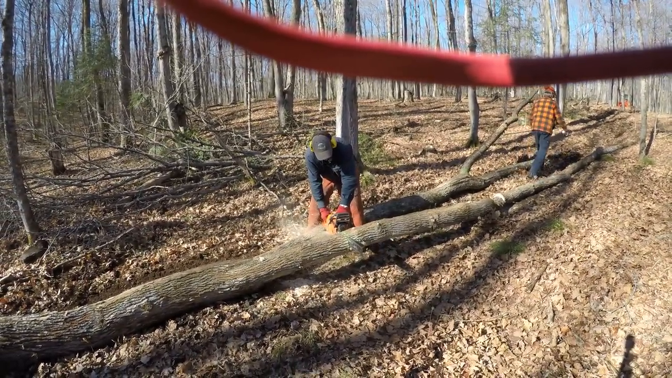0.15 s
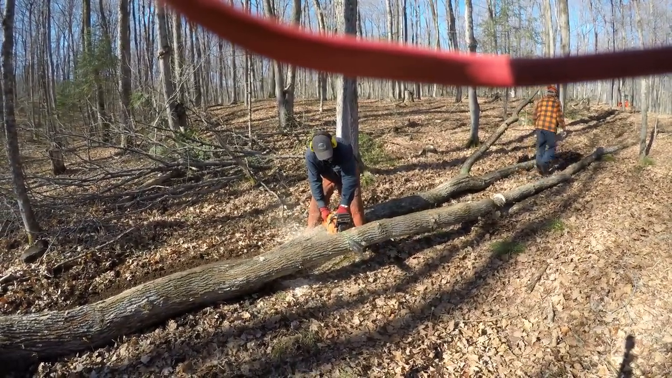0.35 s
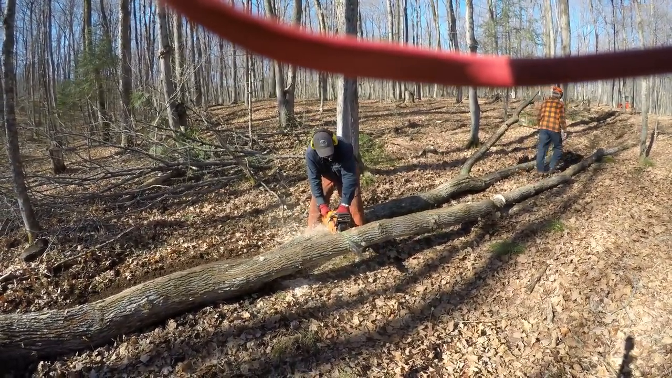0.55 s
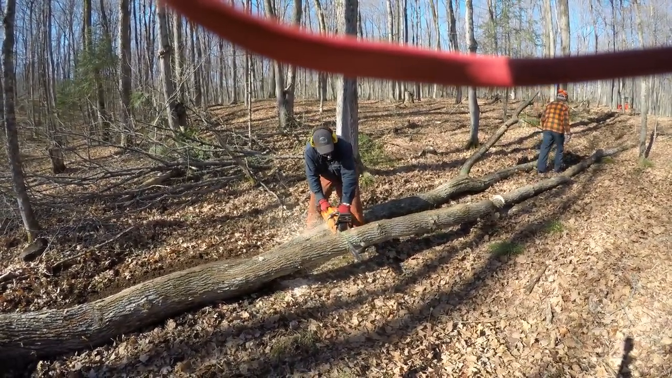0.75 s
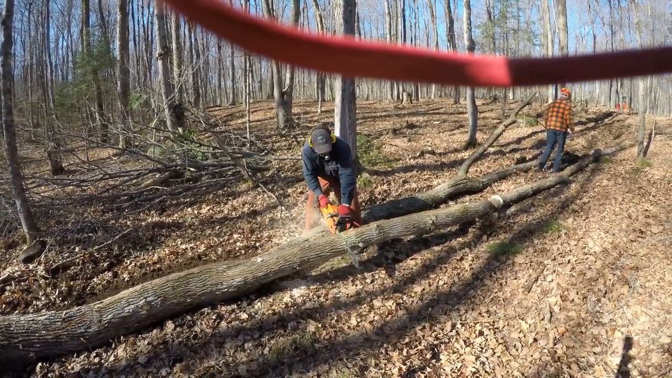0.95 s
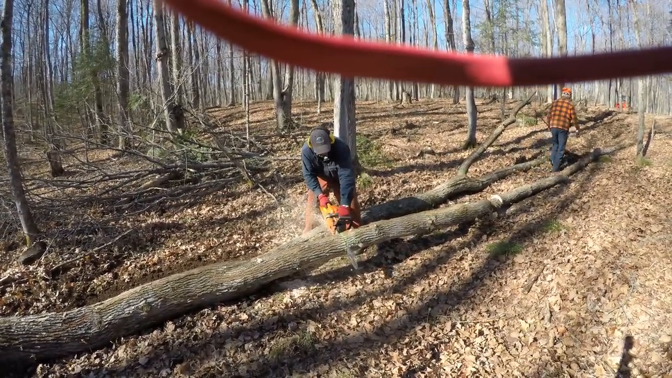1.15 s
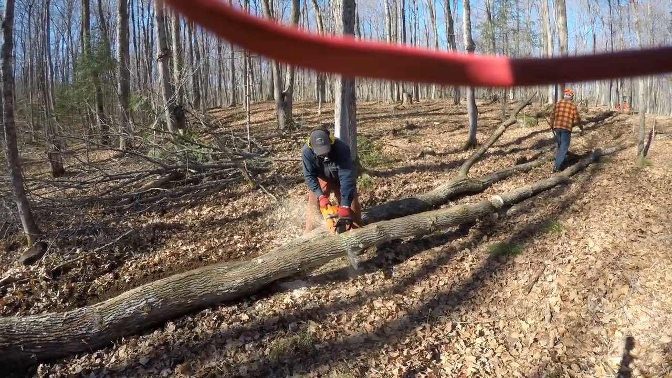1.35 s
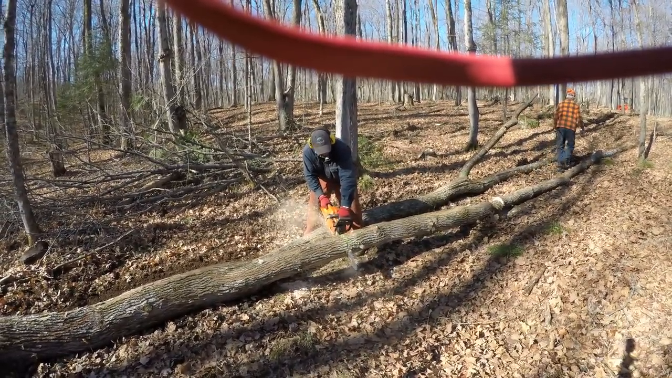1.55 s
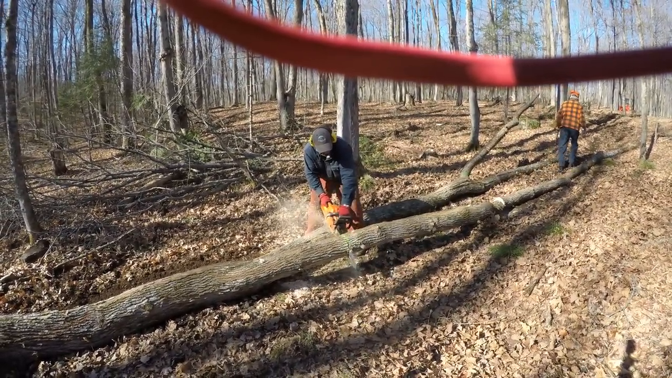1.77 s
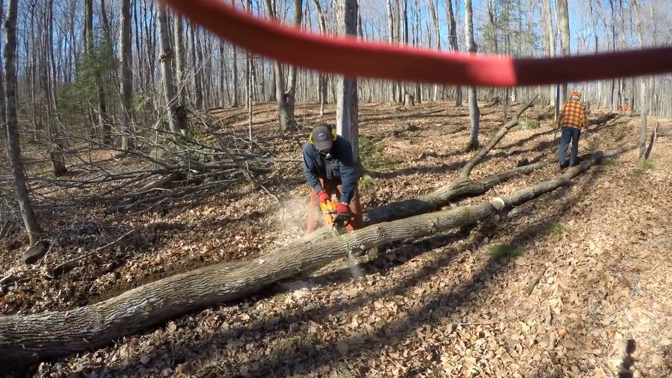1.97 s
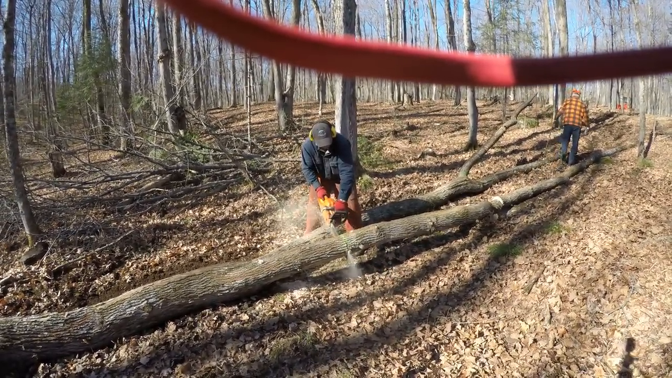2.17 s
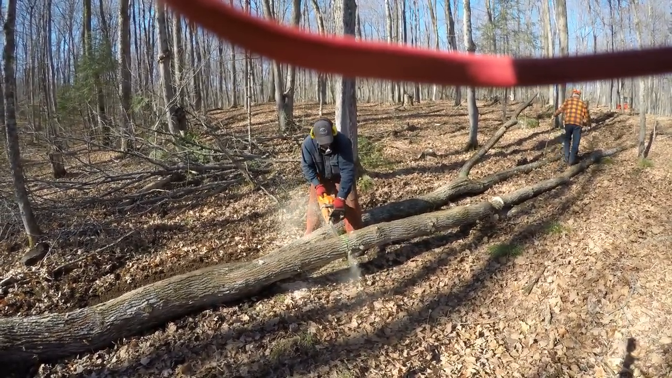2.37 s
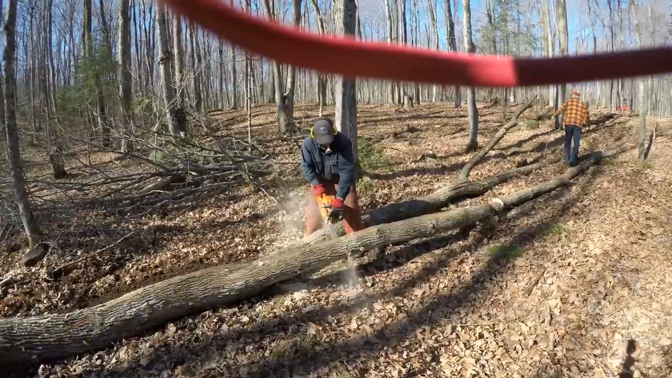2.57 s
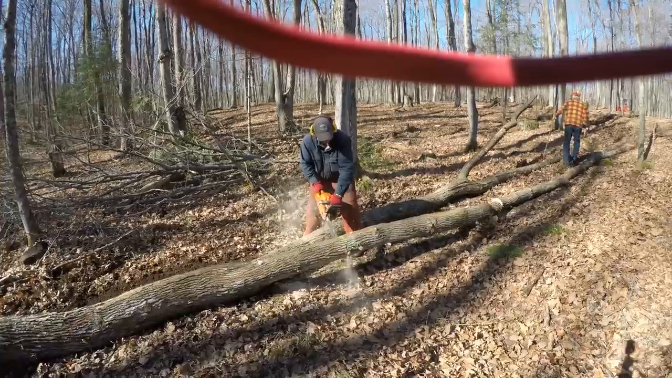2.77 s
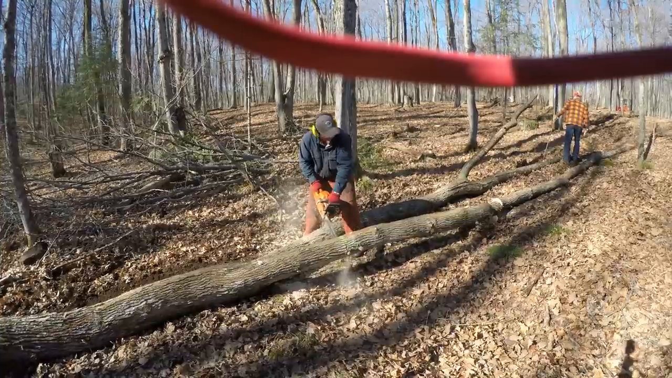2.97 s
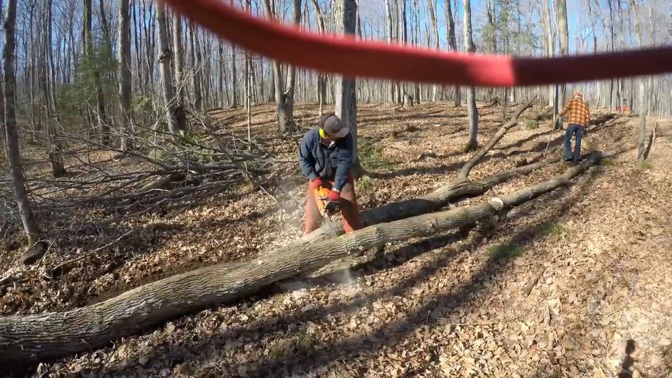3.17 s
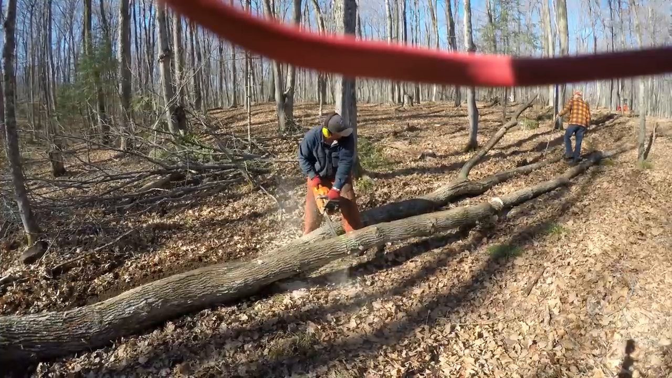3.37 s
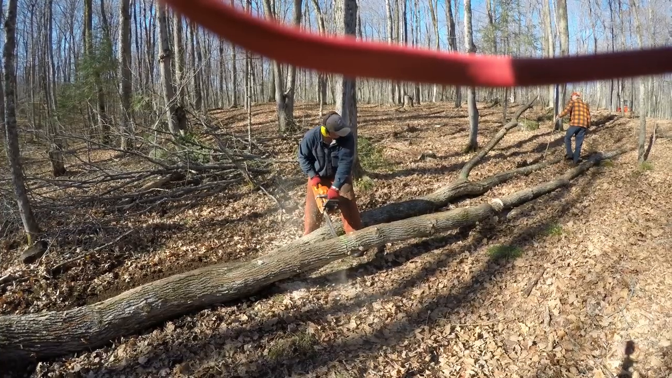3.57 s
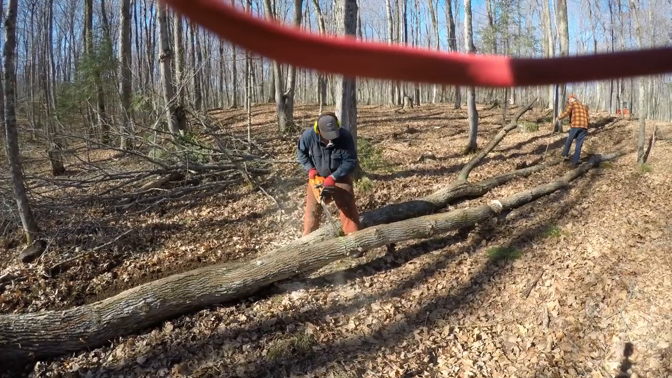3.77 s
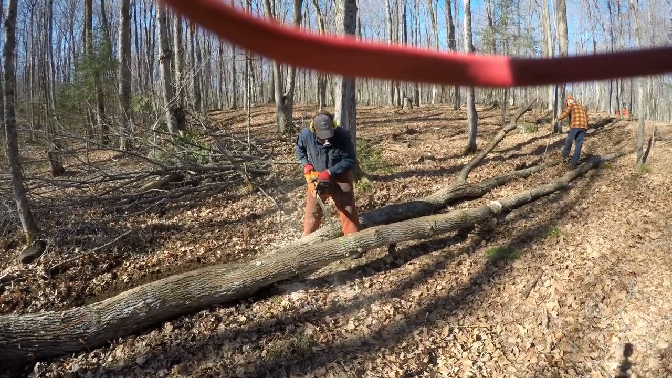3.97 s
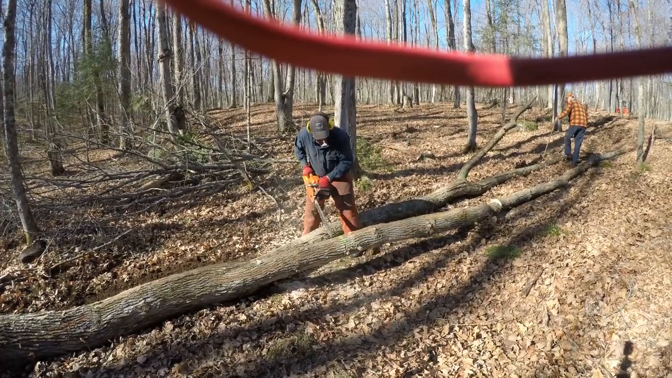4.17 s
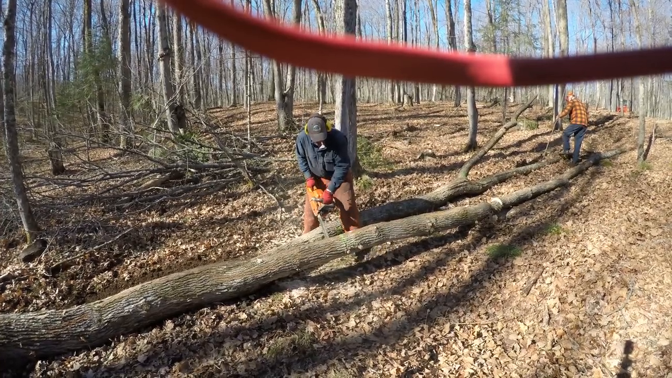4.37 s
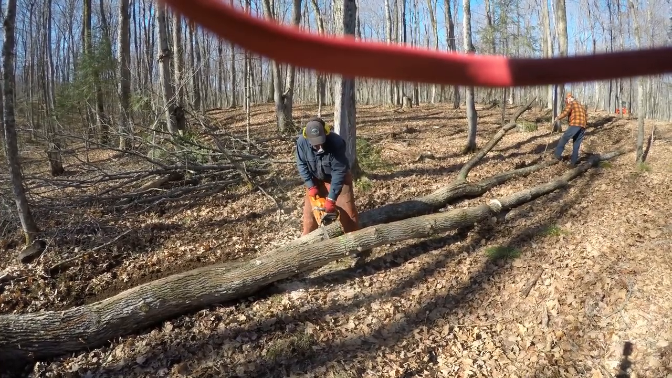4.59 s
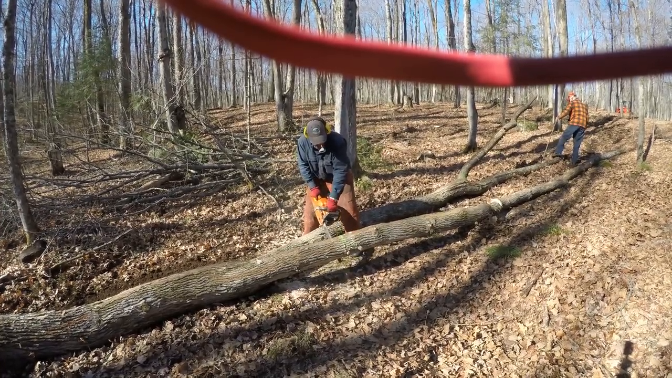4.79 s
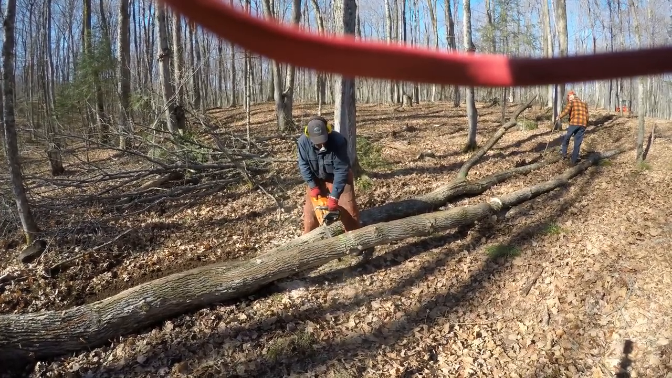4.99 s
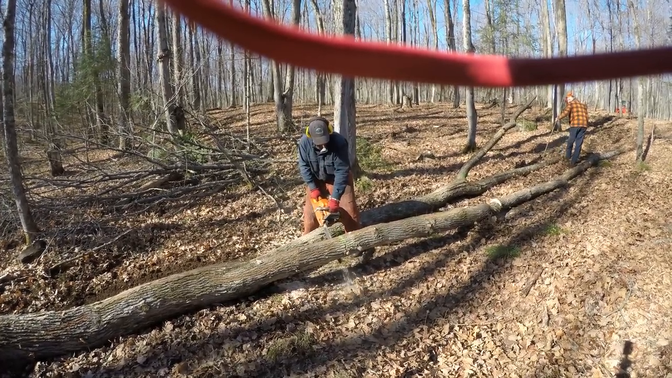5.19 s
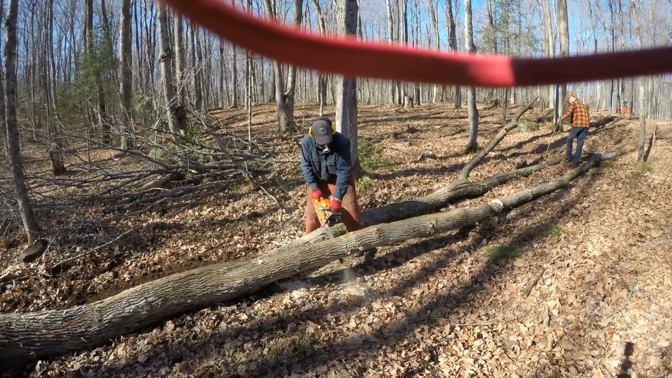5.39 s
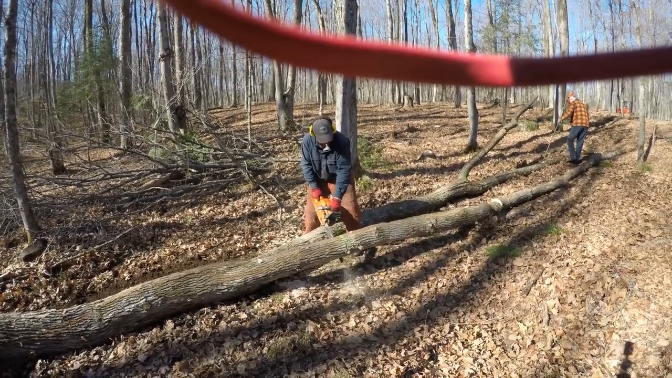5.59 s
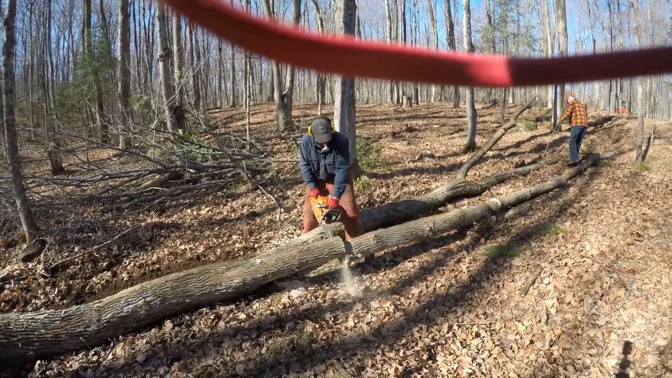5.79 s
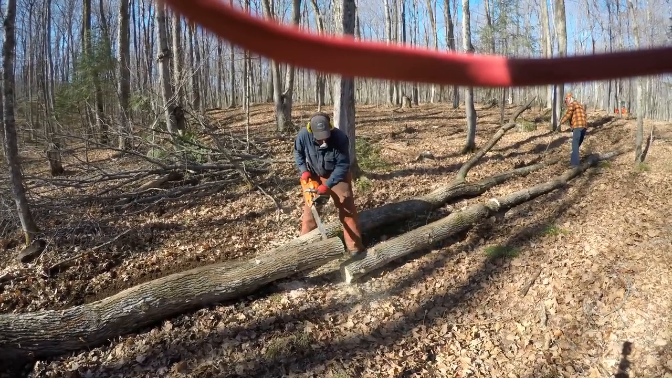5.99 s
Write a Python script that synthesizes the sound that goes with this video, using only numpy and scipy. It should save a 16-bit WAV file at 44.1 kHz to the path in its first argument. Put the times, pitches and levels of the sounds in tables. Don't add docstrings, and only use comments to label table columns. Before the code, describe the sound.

A two-stroke chainsaw roars through a log at full throttle, coasts down to a sputtering idle, revs up raggedly, then bogs abruptly as it pinches.

```python
import sys
import numpy as np
from scipy import signal
from scipy.fft import rfft, irfft, next_fast_len
from scipy.io import wavfile
from scipy.ndimage import uniform_filter1d, map_coordinates

SR = 44100
rng = np.random.default_rng(int(sys.argv[2]) if len(sys.argv) > 2 else 0)


def attenuation_scalar(level_db):
    decades = np.asarray(level_db, float) / 20
    return 10 ** decades


def digitize_waveform(pressure):
    field = np.atleast_2d(pressure).T
    bounded = np.clip(field, -1, 1)
    quanta = np.round(bounded * 32767).astype(np.int16)
    wavfile.write(sys.argv[1], SR, quanta)


N = 266364
SIZE = next_fast_len(N + SR)
FREQ_HZ = np.arange(SIZE // 2 + 1) * SR / SIZE + 1e-3
FINS = 18

# time in seconds, crack peak in dB, thump in dB, gas in dB.
LONE_FIRINGS = [(3.807, -34, -21.5, -32), (3.876, -21, -15.5, -38), (3.974, -21, -14.5, -21),
                (4.082, -25, -16.5, -46), (4.173, -18.5, -15, -22), (4.267, -22, -19, -22),
                (4.341, -21, -22, -23), (4.389, -17, -13.5, -13.5), (4.46, -18, -14, -16),
                (4.483, -16, -13.5, -18.5), (4.505, -10.5, -11, -12.5), (4.541, -14, -11, -8.5),
                (4.572, -18, -13, -13.5), (4.598, -21, -21, -15.5), (5.91, -16, -16, -30),
                (5.939, -14.5, -20, -34)]
# frequency in Hz, gain in dB.
HISS_COLOUR = [(590, -36), (1000, -10.5), (1240, -12.5), (1470, 1), (2150, -5.5), (4120, 0), (5040, -6),
               (6760, 0.5), (8270, -12), (10400, -13), (11500, -23), (12400, -21.5), (13000, -13.5),
               (13400, -87), (14700, -105)]
# frequency in Hz, width in Hz, gain in dB.
CASING_MODES = [(685, 49, 1), (1240, 53, 10), (1766, 66, 2), (2675, 490, 0), (3130, 78, 0.5),
                (3700, 97, -1), (4144, 50, 4.5), (4500, 240, 3), (6780, 460, -8.5), (9300, 150, 2)]
# frequency in Hz, width in Hz, gain in dB.
COVER_MODES = [(1770, 60, 0), (2700, 120, -10), (3790, 110, -5), (4600, 200, -9), (6500, 200, -11)]
# frequency in Hz, left minus right in dB, left lead in radians,
# shared part of the noise (0-1).
PORT_PAIR = [(50, -2.5, 0, .99), (230, -3.5, .4, .99), (400, 4, 1.3, .97), (490, 8.5, 2.6, .95),
             (640, -13, 4.6, .95), (780, -10, 6.5, .97), (950, 3, 7.2, .95), (1200, 0, 6.5, .94),
             (2400, 3.5, 6.6, .92), (4500, 3.5, 6.3, .98), (5000, 5, 5.4, .6), (7000, -5, 6.8, .65),
             (8500, -1, 8.5, .2), (10500, 2, 5.5, .25), (14000, -2, 6.3, .4)]


def on_freq(table, order=1):
    rows = np.array(table, float)
    return np.interp(np.log(FREQ_HZ), np.log(rows[:, 0]), rows[:, order])


def colour(x, gain_db):
    cepstrum = irfft(gain_db * np.log(10) / 20)
    half = len(cepstrum) // 2
    cepstrum[1:half] *= 2
    cepstrum[half + 1:] = 0
    return irfft(rfft(x, SIZE) * np.exp(rfft(cepstrum)), SIZE)[..., :N]


def unit(x):
    return x / np.sqrt(np.mean(x ** 2))


def walk(rate_hz):
    levels = rng.standard_normal(4096)
    return 1.227 * map_coordinates(levels, [np.arange(N) * rate_hz / SR], order=1)


def noise():
    shared = np.clip(on_freq(PORT_PAIR, order=3), 0, 1)
    mid, side = rfft(rng.standard_normal((2, SIZE)))
    pair = mid * np.sqrt((1 + shared) / 2) + side * np.sqrt((1 - shared) / 2) * np.array([[1], [-1]])
    return irfft(pair, SIZE)[:, :N]


def casing(floor_db, modes=CASING_MODES):
    peaks = sum(attenuation_scalar(db) ** 2 / (1 + ((FREQ_HZ - hz) / width_hz * 2) ** 2) for hz, width_hz, db in modes)
    return 10 * np.log10(attenuation_scalar(floor_db) ** 2 + peaks)


def spells(t, rows, edge_s):
    total = 0
    for start_s, end_s, *size in rows:
        gate = np.clip(np.minimum(t - start_s, end_s - t) / edge_s + .5, 0, 1)
        total = total + gate * (size or [1])[0]
    return total


def by_speed(hz, table):
    at_hz, *columns = np.transpose(table)
    return np.array([np.interp(hz, at_hz, column) for column in columns])


def controls(t):
    # time in seconds, crank speed in Hz, bar clear of the wood (0-1).
    cut = [(0, 186.1, 0.45), (0.288, 182.3, 0.5), (.49, 187.4, 0.3), (.91, 176.4, 0), (1.279, 163.1, 0.34),
           (1.72, 174.1, 0), (1.972, 178.7, 0.46), (2.09, 173.2, 0.71), (2.4, 190.2, 0.8), (2.79, 203.1, 1),
           (2.96, 210.4, 1)]
    # time in seconds, crank speed in Hz.
    pinch = [
        (5.74, 197.4),
        (5.8, 117.9),
        (5.82, 115.4),
        (5.87, 135.2),
        (5.93, 137.3),
        (6.04, 124),
    ]
    idle_hz, coast_s, coast_shape = 41, .434, 1.26
    pickup_s, free_hz, climb_s = 4.475, 214, .52
    stall_s, stall_length_s, stall_share = 4.82, .1, .5
    s, cut_hz, cut_clear = np.transpose(cut)
    coasted_s = np.clip(t - s[-1], 0, None)
    coast_hz = idle_hz + (np.interp(t, s, cut_hz) - idle_hz) * np.exp(-(coasted_s / coast_s) ** coast_shape)
    lost_s = stall_share * np.clip(t - stall_s, 0, stall_length_s)
    climb = 1 - np.exp(-np.clip(t - pickup_s - lost_s, 0, None) / climb_s)
    climb_hz = coast_hz + (free_hz - coast_hz) * climb
    hz = np.where(t < pinch[0][0], climb_hz, np.interp(t, *np.transpose(pinch)))
    clear = np.where(t < pickup_s, np.interp(t, s, cut_clear), np.clip(1.15 * climb, 0, 1) ** 4)
    return uniform_filter1d(hz, SR // 100), clear


def levels_db(hz, clear, off):
    # crank speed in Hz, hum in dB, second order in dB, intake ring in dB, bark in dB.
    held = [(57.4, -23, -4, -20, -26), (88, -9.5, -34.5, -35, -22), (123, -10.5, -43.5, -36, -26),
            (152.5, -10, -37, -33, -24), (164.1, -11, -35.5, -19.5, -27), (173.7, -11, -40, -21.5, -28.5),
            (186.2, -9.5, -37, -20.5, -31), (216, -13, -38.5, -19, -22)]
    # crank speed in Hz, hum in dB, second order in dB, intake ring in dB, bark in dB.
    coasting = [(43.7, -43, -28, -17, -35.5), (50, -32, -25, -25.5, -36), (59, -31, -27.5, -37, -32.5),
                (85.6, -27.5, -27, -42, -28.5), (118, -17.5, -36, -44, -30.5),
                (200, -17.5, -30.5, -50, -38.5)]
    hum, second, ring, puff = (1 - off) * by_speed(hz, held) + off * by_speed(hz, coasting)
    second = second + (1 - off) * clear * 15
    held_hiss = -25 + 2.5 * clear ** 3 + 5.5 * np.minimum(np.log2(hz / 110), 0)
    coast_hiss = -20 + 8 * np.log2(hz / 200)
    return hum, second, ring, puff, (1 - off) * held_hiss + off * coast_hiss


def crank(hz):
    turns = np.cumsum(hz * (1 + 0.001446 * walk(30))) / SR
    at = (np.array(LONE_FIRINGS)[:, 0] * SR).astype(int)
    first = turns[at[0]]
    whole = np.round(first) + np.cumsum(np.round(np.diff(turns[at], prepend=first)))
    return turns + np.interp(np.arange(N), at, whole - turns[at])


def muffler(turns, hz, depth, idle, hum_db, second_db, ring_db):
    angle = 2 * np.pi * turns
    slip = 0.8 * walk(14)
    above = np.clip((175 - hz) / 50, .12, 1)
    halves = (np.sin(angle / 2 + slip) + above * np.sin(angle * 3 / 2 + slip)) / 2
    halves = depth * attenuation_scalar(2.7 * walk(27)) * halves
    hum = attenuation_scalar(hum_db) * ((1 + 0.0081 * walk(70)) * np.sin(angle + 1) + halves)
    second = attenuation_scalar(second_db + walk(9.5)) * np.sin(2 * angle + 2.54)
    since = (turns - .12) % 1
    burst = 1 - idle + idle * 14 * since * np.exp(-since / 0.26) * attenuation_scalar(1.95 * walk(40))
    wobble = .55 * idle * walk(45)
    ring = np.sin(4 * angle + 0.86 + wobble)
    ring = ring + 0.15 * idle * np.sin(8 * angle + 3.6 * wobble)
    ring = ring + 0.074 * idle * np.sin(6 * angle + 3.3 * wobble)
    return np.sqrt(2) * (hum + second + attenuation_scalar(ring_db + 0.13 * walk(15)) * burst * ring)


def third_order(turns, hz, off, pull, waver_db):
    tone = np.sin(6 * np.pi * turns)
    chamber = 1 / (1 + ((3 * hz - 507) / 57) ** 2) ** .5
    lowest = 1 / (1 + ((3 * hz - 201.5) / 30) ** 2)
    high = attenuation_scalar(-28.5 - 12 * off + 9.5 * pull + walk(15)) * chamber
    return tone * (high + off * attenuation_scalar(-30.5 - waver_db) * lowest)


def bark(turns, charge, slow):
    # multiple of crank speed, level in dB.
    order_db = [(1, 0), (2, -20), (3, -13.5), (4, -10), (5, -21.5), (6, -17.5), (7, -21), (8, -20.5),
                (9, -20), (10, -41.5), (11, -55), (12, -20.5), (13, -69), (14, -23), (15, -54), (16, -22.5),
                (17, -29), (18, -13), (19, -54), (20, -28), (21, -47), (22, -36.5), (23, -25), (24, -46),
                (25, -41), (26, -27), (27, -23.5), (28, -41), (29, -39), (30, -29.5)]
    # frequency in Hz, gain in dB.
    bark_colour = [(100, -51.5), (300, 10), (550, 2), (800, 9.5), (1100, -7.5), (1500, 7), (1800, 0.5),
                   (2200, -1), (3100, -5), (4200, 11.5), (5200, 1), (7000, 8), (9000, -10.5)]
    multiple, db = np.transpose(order_db)
    total = 0
    for k in range(5, 44):
        if k in (FINS, 2 * FINS):
            continue
        swell = attenuation_scalar(np.interp(k, multiple, db) + 1.9 * walk(8) - 13.3 * slow)
        fray = (.02 * k + slow * (.8 + .08 * k)) * walk(30)
        total = total + swell * np.cos(2 * np.pi * k * turns + fray)
    return unit(colour(total * charge, on_freq(bark_colour)))


def rattle(charge, bark_db, off):
    # frequency in Hz, gain in dB.
    rattle_colour = [(25, -31), (60, -11), (120, 2), (250, -4), (450, -5), (750, 3), (1100, -1.5),
                     (1600, -26.5)]
    rough = unit(colour(noise() * charge, on_freq(rattle_colour)))
    return rough * attenuation_scalar(bark_db + 2 * off - 7.5 + 1.8 * walk(25.36))


def firings():
    # frequency in Hz, gain in dB.
    crack_colour = [(200, -39), (400, 16.5), (750, 19), (1150, 8), (1500, -53), (1800, -12), (3000, -46)]
    s, crack_db, thump_db, gas_db = np.transpose(LONE_FIRINGS)
    t = np.arange(SR // 20) / SR
    hits = np.zeros((3, N))
    hits[:, (s * SR).astype(int)] = attenuation_scalar(np.array([thump_db + 6.5, crack_db + 0.5, gas_db + 5.5]))
    swing = np.sin(2 * np.pi * 115 * t) * t * np.exp(-t / 0.0031)
    click = colour(np.eye(1, N)[0], on_freq(crack_colour))[:len(t)]
    thump = signal.fftconvolve(hits[0], swing / np.abs(swing).max())[:N]
    crack = signal.fftconvolve(hits[1], click / np.abs(click).max())[:N]
    gas = noise() * signal.fftconvolve(hits[2], np.exp(-t / 0.0087))[:N]
    treble_loss_db = 14 * np.log2(np.clip(FREQ_HZ / 6500, 1, 8))
    dull_db = on_freq(HISS_COLOUR) + casing(-13.5, COVER_MODES) - treble_loss_db
    return thump + crack + colour(gas, dull_db + 7)


def hiss(turns, charge, idle, punch):
    puff = charge * (5.7 + np.exp(-(turns % 1) / 3.6))
    scrape = attenuation_scalar(0.96 * walk(15) + 0.53 * walk(42) + 0.31 * walk(500))
    air = unit(colour(noise() * puff * scrape, on_freq(HISS_COLOUR) + casing(2.3)))
    punch_turns = .2
    air = air * (1 + 2 * punch * (np.exp(-(turns % 1) / punch_turns) - punch_turns))
    low = signal.sosfiltfilt(signal.butter(2, 8500, fs=SR, output="sos"), air)
    return air - .75 * idle * (air - low)


def slap(turns, scatter_db, modes):
    knock = np.diff(np.floor(turns + .22), prepend=np.floor(turns[0] + .22))
    blow = signal.fftconvolve(knock * attenuation_scalar(scatter_db * walk(90)), np.hanning(7))[:N]
    ring = colour(blow, casing(-58.0, modes))
    return ring / np.sqrt(uniform_filter1d(ring ** 2, SR // 4) + 1e-12)


def pops(turns, charge, pull):
    # frequency in Hz, width in Hz, gain in dB.
    port_modes = [(776, 200, -0.5), (1490, 210, -8), (4220, 190, -0.5)]
    return attenuation_scalar(-25) * pull * charge * slap(turns - .3, 3.0, port_modes)


def knocks(turns, charge, idle, pull, hiss_db):
    power = attenuation_scalar(hiss_db - 6 + 5 * pull) * (1 - idle) * slap(turns, 1.4, CASING_MODES) * charge
    return power + attenuation_scalar(hiss_db - 2.5) * idle * slap(turns, 3.5, COVER_MODES)


def fan(turns, octaves):
    angle = 2 * np.pi * FINS * turns
    fin = attenuation_scalar(2.5 * walk(28)) * np.sin(angle + .7 * walk(45))
    octave = attenuation_scalar(3 * walk(28)) * np.sin(2 * angle + .7 * walk(45))
    fin_db = -33 + 2.5 * walk(11) + 9 * octaves
    octave_db = -36.5 + 2.5 * walk(11) - 22 * np.abs(octaves + .65)
    return attenuation_scalar(fin_db) * fin + attenuation_scalar(octave_db) * octave


def trunks(x):
    t60_s, first_s, wet_db = 0.1, .012, -22
    t = np.arange(SR // 2) / SR
    tail = rng.standard_normal((2, len(t))) * attenuation_scalar(-60 * t / t60_s) * (t > first_s)
    tail = tail / np.sqrt(np.sum(tail[0] ** 2))
    tail = signal.sosfilt(signal.butter(2, 250, "high", fs=SR, output="sos"), tail)
    return attenuation_scalar(wet_db) * signal.fftconvolve(x, tail, axes=1)[:, :N]


def rumble(t, octaves, clear):
    # time in seconds, length in seconds, level in dB.
    puffs = [
        (0, .1, -42),
        (2.96, .04, -44),
        (5.885, .03, -19),
        (6.04, .03, -19),
    ]
    gusts = sum(attenuation_scalar(db) * np.exp(-((t - s) / length_s) ** 2) for s, length_s, db in puffs)
    low = unit(colour(noise(), -18 * np.abs(np.log2(FREQ_HZ / 33))))
    return low * (gusts + attenuation_scalar(-63 - 8 * octaves + 11 * clear))


def scene():
    # start in seconds, end in seconds, depth (0-1).
    stutter = [
        (1.75, 2.6, 0),
        (2.655, 2.976, .14),
        (4.51, 4.595, 0.54),
        (4.827, 4.982, 0.39),
    ]
    # start in seconds, end in seconds.
    released = [
        (2.973, 4.53),
        (5.88, 6.3),
    ]
    t = np.arange(N) / SR
    hz, clear = controls(t)
    octaves = np.log2(hz / 200)
    off = spells(t, released, edge_s=0.069)
    idle = np.clip((95 - hz) / 40, 0, 1)
    slow = np.clip((150 - hz) / 55, 0, 1)
    pull = slow * (1 - off)
    hum_db, second_db, ring_db, bark_db, hiss_db = levels_db(hz, clear, off)
    turns = crank(hz)
    waver_db = 3 * off * slow * walk(25)
    depth = 0.044 * clear + spells(t, stutter, edge_s=0.096)
    ring_db = ring_db - 60 * depth * (1 - slow)
    charge = 1 + depth * np.sin(np.pi * turns + 2.2) + 0.015 * walk(70)

    saw = muffler(turns, hz, depth, idle, hum_db + waver_db, second_db - waver_db, ring_db)
    saw = saw + third_order(turns, hz, off, pull, waver_db)
    saw = saw + attenuation_scalar(bark_db + 1.0 - 1.15 * idle) * bark(turns, charge, slow * off + .3 * pull)
    saw = saw + pops(turns, charge, pull)
    saw = saw + rattle(charge, bark_db, off) + firings()
    saw = saw + attenuation_scalar(hiss_db + 1.74 - 1.1 * idle) * hiss(turns, charge, idle, pull + off * idle)
    saw = saw + knocks(turns, charge, idle, pull, hiss_db)
    saw = saw + attenuation_scalar(3 * clear ** 3 * (1 - slow) - 4 * off * idle) * fan(turns, octaves)
    return saw + trunks(saw) + rumble(t, octaves, clear)


def top_cut(x):
    return signal.sosfilt(signal.butter(12, 14820, fs=SR, output="sos"), x)


def record(dry):
    lean = on_freq(PORT_PAIR) * np.log(10) / 20 + 1j * on_freq(PORT_PAIR, order=2)
    ports = np.exp(np.outer([.5, -.5], lean))
    ports = ports / np.maximum(np.abs(ports.mean(axis=0)), .4)
    pair = irfft(rfft(dry, SIZE) * ports, SIZE)[:, :N]
    rounded = pair / (1 + (pair / .93) ** 6) ** (1 / 6)
    return top_cut(rounded)


dry = scene()
out = record(dry)
digitize_waveform(out)
```